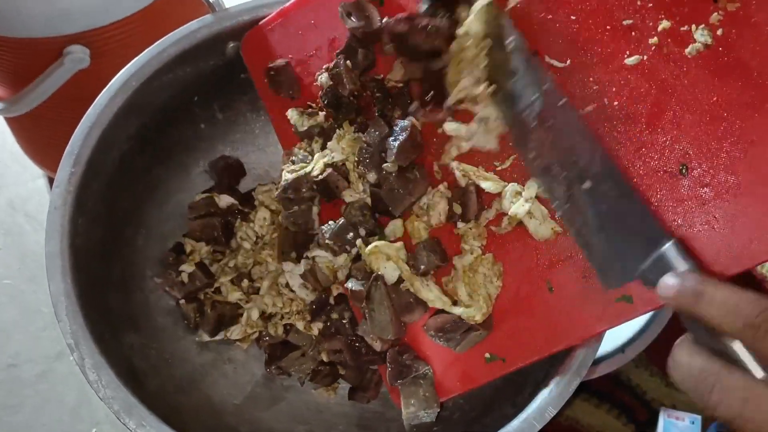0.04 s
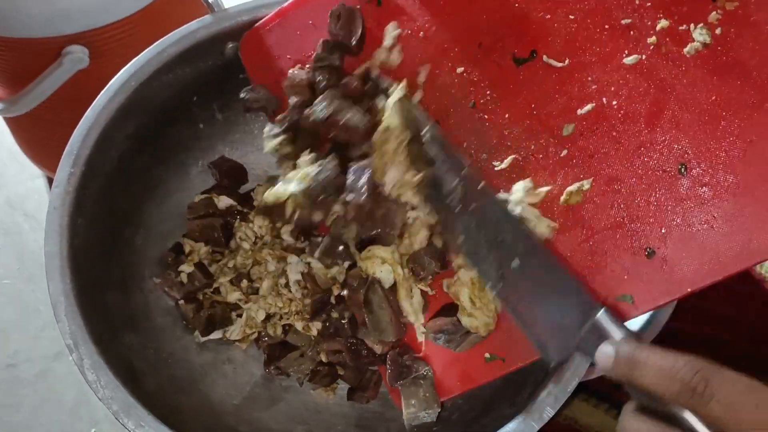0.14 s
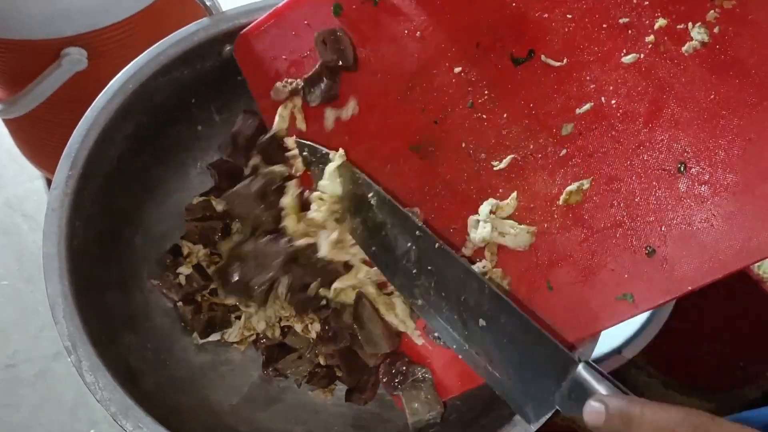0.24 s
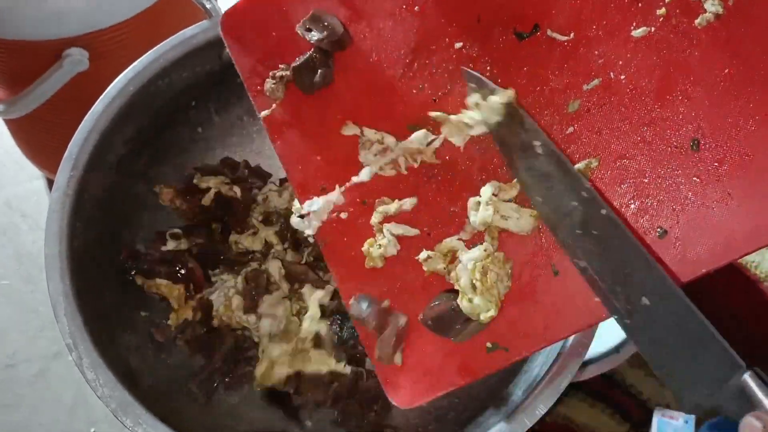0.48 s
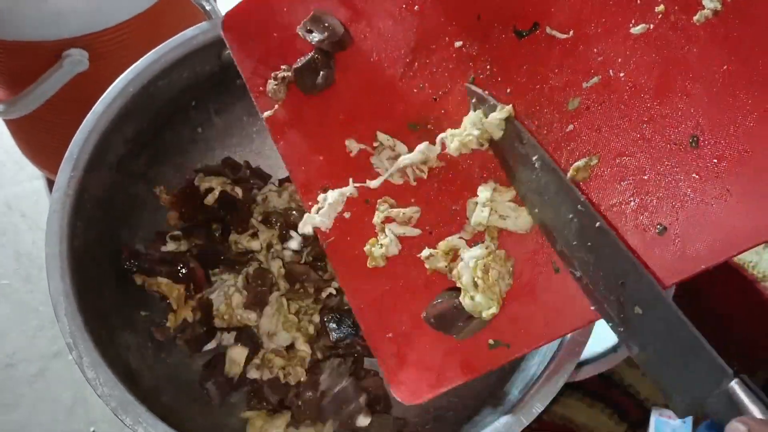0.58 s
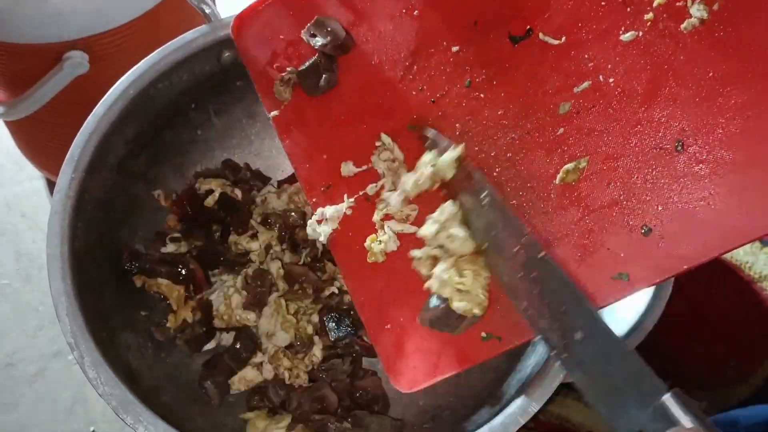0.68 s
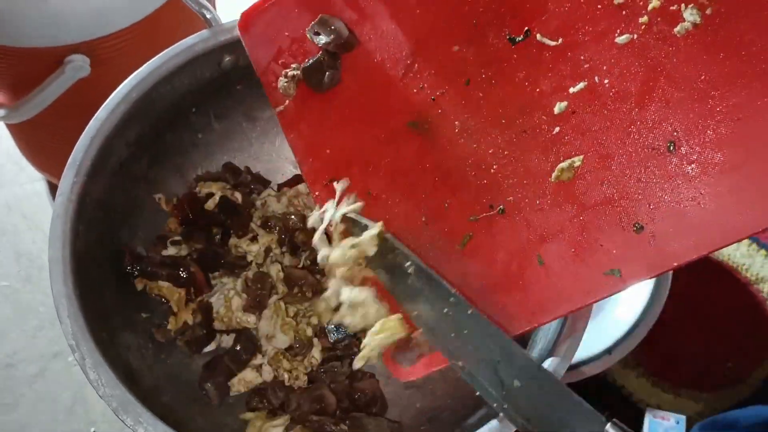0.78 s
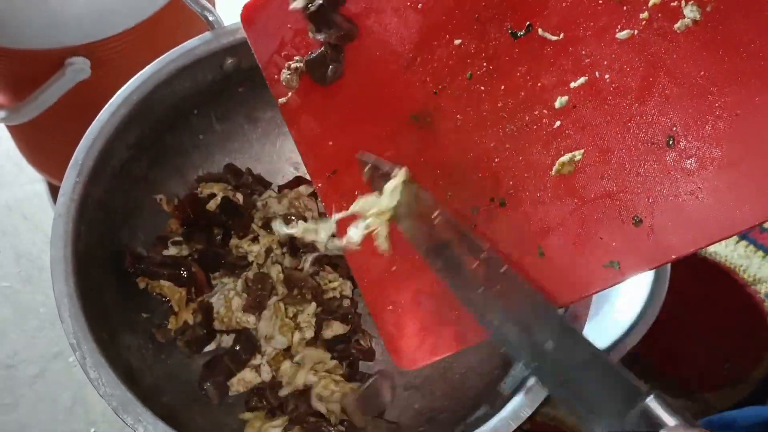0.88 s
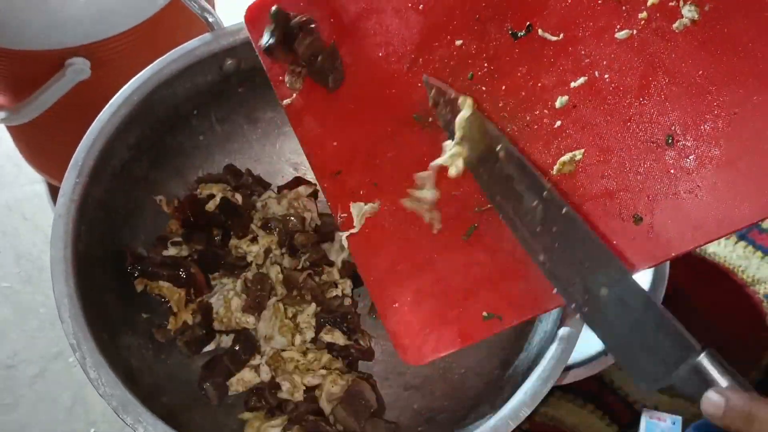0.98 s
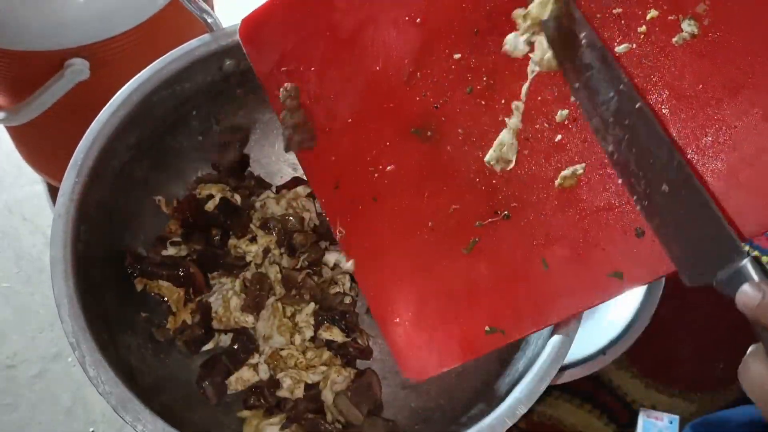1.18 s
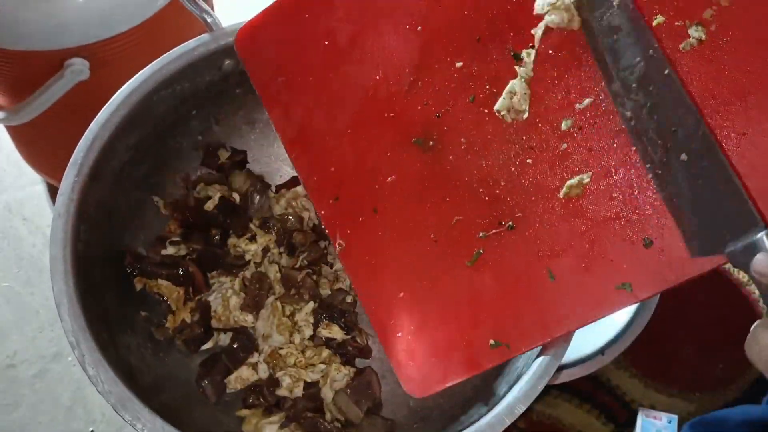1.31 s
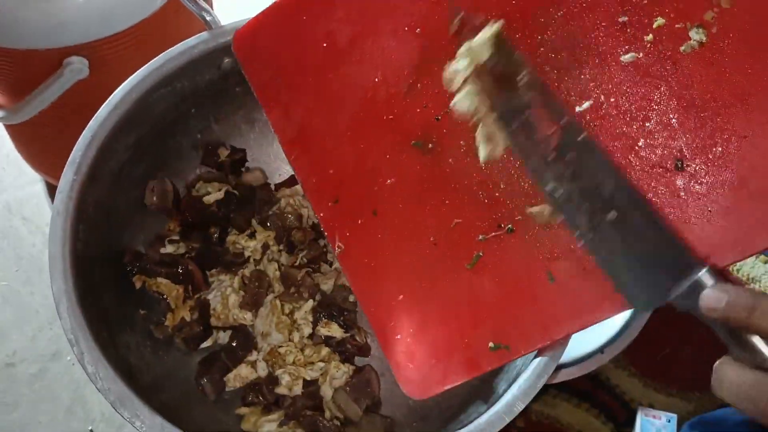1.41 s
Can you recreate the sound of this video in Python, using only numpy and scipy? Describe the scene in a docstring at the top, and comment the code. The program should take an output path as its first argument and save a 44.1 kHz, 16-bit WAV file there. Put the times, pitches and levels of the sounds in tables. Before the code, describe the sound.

A steel knife taps and scrapes a plastic board, whose edge then clangs on a metal pot

```python
"""Outdoor hiss and a low rumble, made of shaped noise, run throughout; a faint landing in a metal pot opens.
Then a steel knife taps and drags over a plastic board: noise cracks and slips, with ringing sines.
Near the middle the board's edge clangs and chatters on the pot's rim: ringing sines, noise and random bumps.
Light ticks and knocks are scattered from the taps on; later, meat drops into the pot in two soft clusters.
Nearby walls echo it all; two unlike microphone ports hear it."""
import sys
import numpy as np
from scipy import signal
from scipy.fft import rfft, irfft, next_fast_len
from scipy.io import wavfile
from scipy.ndimage import uniform_filter1d

SR = 44100
rng = np.random.default_rng(int(sys.argv[2]) if len(sys.argv) > 2 else 0)


def boost_factor(decibels):
    """Convert a level in decibels to a linear amplitude factor."""
    exponent = np.asarray(decibels, float) / 20
    return 10 ** exponent


def to_wav(sig):
    """Store sig (one row per channel, or 1-D mono) as 16-bit WAV at the path in sys.argv[1].

    Samples outside -1..1 are clipped; the rate is SR.
    """
    pcm = np.clip(np.atleast_2d(sig), -1, 1) * 32767
    pcm = np.round(pcm).astype(np.int16)
    wavfile.write(sys.argv[1], SR, pcm.T)  # frames by channels


N = 63945  # samples in the scene

# slow bending of the plastic board: f/Hz, level/dB, time to fade by 60 dB t60/s
BOARD_LOW = [(81.5, -24, 1), (125.4, -8.5, 0.52), (378, -9, 0.17), (407, -6.5, 0.1), (833, -25, 0.032)]
# high ringing of board and blade: f/Hz, level/dB, t60/s
BOARD_HIGH = [(1305, -8.5, 0.059), (1800, 3, 0.044), (1913, -3.5, 0.075), (2490, -5.5, 0.056),
              (3396, 0.5, 0.03), (3990, 0, 0.034), (6140, -11.5, 0.1)]
# ringing of the metal pot: f/Hz, level struck at the rim/dB, level struck inside/dB, t60/s
POT = [(126.1, -17, -18.5, 0.37), (276.7, -17.5, -24, 0.5), (421.4, -17, -3, 0.15), (499.2, -9, -6, 0.19),
       (593.6, 10, 0.5, 0.051), (615, 0.5, -21, 0.22), (693, -6, -22, 0.16), (832, -7, -8, 0.2),
       (1222.7, -2, -7.5, 0.15), (1765, -16, -13.5, 0.18), (2326, -10, -24, 0.2), (2575, -7.5, -33, 0.38),
       (3112, -4.5, -24, 0.057), (4280, -9.5, -41, 0.08), (4705, -21, -10.5, 0.054),
       (5560, -13, -12.5, 0.082), (6024, -8, -9, 0.044), (7920, -29, -41, 0.23)]
# the board's edge hits the rim: t/s, level/dB, contact time/s
CLANG = (.6832, -10.5, 0.0055)
# how alike a sound is at both ports: f/Hz, likeness from 0 to 1
ALIKE = [(100, 0.98), (400, 0.95), (1000, 0.59), (2000, 0.03), (5000, 0)]


def unit(x):
    """Scale to an rms (average strength) of 1."""
    return x / np.sqrt(np.mean(x ** 2) + 1e-20)


def along(points, hz):
    """Read a curve of (f/Hz, value) points, evenly in pitch."""
    f, value = np.transpose(points)
    return np.interp(np.log(hz + 1), np.log(f + 1), value)


def filtered(x, response):
    """Change each frequency's strength and timing by a complex response."""
    n = x.shape[-1]
    padded = next_fast_len(n + 8192)
    return irfft(rfft(x, padded) * response(np.fft.rfftfreq(padded, 1 / SR)), padded)[..., :n]


def half_angle(hz):
    """Half the angle that sets two ports apart: small where they are alike."""
    return np.arccos(np.clip(along(ALIKE, hz), 0, 1)) / 2


def ported(pair, gain):
    """Two unrelated signals become left and right: alike in the bass, unlike in the treble."""
    mid, side = filtered(pair, lambda hz: gain(hz) * [np.cos(half_angle(hz)), np.sin(half_angle(hz))])
    return np.array([mid + side, mid - side])


def noise(spectrum, length, centre_hz=None, octaves=1, top_loss_db=60):
    """Coloured stereo noise, rms 1 over its first 8 ms, optionally leaning to one pitch region."""
    def gain(hz):
        db = along(spectrum, hz)
        if centre_hz is not None:
            distance = np.log2((hz + 1) / centre_hz) / octaves
            most_loss = np.where(hz > centre_hz, top_loss_db, 80)
            db = db - np.minimum(6 * distance ** 2, most_loss)
        return boost_factor(db)

    burst = ported(rng.standard_normal((2, length)), gain)
    return burst / np.sqrt(np.mean(burst[:, :SR // 125] ** 2))


def ringing(modes, t, scatter_db):
    """Fading, slightly wavering sines; high ones reach the two ports at unlike phases."""
    hz, db, t60 = np.transpose(modes)[:, :, None]
    luck = rng.standard_normal((3, len(hz), 1))  # for level, starting phase and port phase
    knots = rng.standard_normal((len(hz), 40))
    wander = np.array([np.interp(t * 75, np.arange(len(k)), k) for k in knots])  # 75 knots a second
    waver = 0.84 * np.clip(hz / 600, 0, 1) * wander  # low modes are steadier
    apart = half_angle(hz) * luck[2]
    size = boost_factor(db + scatter_db * luck[0] - 60 * t / t60) * np.exp(waver / 2) / 2
    phase = 2 * np.pi * hz * t + luck[1] + waver
    return np.array([(size * np.sin(phase + side * apart)).sum(axis=0) for side in (1, -1)])


def add(track, s, sound):
    """Mix a sound in at time s, in seconds."""
    track[:, round(s * SR):][:, :sound.shape[1]] += sound


def air():
    """Outdoor hiss and rumble: noise whose loudness varies in soft patches of time and pitch."""
    # colour of the air: f/Hz, level/dB
    air_colour = [(40, -28), (72, 3), (140, -4.5), (330, -18.5), (620, -9.5), (2400, -19.5), (3650, -15),
                  (3900, -4.5), (4800, -18), (5400, -9.5), (6400, -20), (7200, -25), (11000, -35),
                  (14300, -30), (16400, -54)]
    z = signal.stft(rng.standard_normal((2, N)), nperseg=512)[2]
    patches = uniform_filter1d(rng.standard_normal(z.shape[1:]), 5, 0)  # smooth over pitch
    patches = uniform_filter1d(patches, 9, 1)  # smooth over time
    pair = signal.istft(z * boost_factor(3.9 * unit(patches)), nperseg=512)[1][:, :N]
    return boost_factor(-54) * unit(ported(pair, lambda hz: boost_factor(along(air_colour, hz))))


def yard(x):
    """Nearby walls answer with a fading noise tail, differently on each side."""
    # fading of the echo: f/Hz, t60/s
    wall_fade = [(150, 0.56), (1000, 0.39), (4000, 0.29), (12000, 0.18)]
    hz, t, z = signal.stft(rng.standard_normal((2, SR // 2)), SR, nperseg=256)
    tail = signal.istft(z * boost_factor(-60 * t / along(wall_fade, hz)[:, None]), SR, nperseg=256)[1]
    delayed = np.pad(x[:1], ((0, 0), (250, 0)))  # the left side, 250 samples late
    echo = signal.fftconvolve(delayed, tail / np.linalg.norm(tail[0]), axes=1)
    return boost_factor(-8.5) * ported(echo[:, :N], np.ones_like)


def ticks():
    """Light ticks and knocks: short noises, each around one pitch."""
    # light ticks and knocks: t/s, level/dB, f/Hz
    light_hits = [(0.267, -31.5, 1730), (0.413, -29, 590), (.4995, -24, 862), (0.8343, -30.5, 1870),
                  (0.888, -35.5, 1880), (1.0007, -32.5, 2950), (1.032, -29, 1820), (1.327, -36.5, 2810),
                  (1.33, -38, 1790)]
    out, t = np.zeros((2, N + SR)), np.arange(SR // 4) / SR
    for s, db, hz in light_hits:
        hit = noise([(3600, 2), (5500, -34)], len(t), hz, octaves=0.12, top_loss_db=17.5)
        add(out, s, boost_factor(db - 60 * t / 0.036) * (1 - np.exp(-t / 0.0018)) * hit)
    return out[:, :N]


def landings():
    """Meat lands in the pot: a soft noise thud and the pot's ring from inside."""
    # landings: t/s, ring level/dB, thud level over the ring/dB
    drops = [(.009, -40.5, 6.5), (0.9695, -18.5, 7), (.986, -28.5, 14), (1.002, -26.5, 9.5),
             (1.04, -31, 5.5), (1.2978, -25.5, 6.5), (1.312, -38, 17), (1.321, -33, 13), (1.334, -40, 11.5)]
    # colour of the soft thud: f/Hz, level/dB
    plop_colour = [(100, -23), (330, -12), (500, -1.5), (900, -7.5), (1300, -13), (2000, -21.5),
                   (3200, -28.5), (6000, -35.5), (9000, -59.5)]
    out, t = np.zeros((2, N + SR)), np.arange(SR * 2 // 5) / SR
    inside = np.delete(POT, 1, axis=1)
    loudest_db = max(drop[1] for drop in drops)
    for s, db, thud_db in drops:
        # softer landings wake the modes above 4500 Hz less
        modes = inside - np.outer(inside[:, 0] > 4500, [0, loudest_db - db, 0])
        thud = boost_factor(thud_db - 60 * t / 0.021) * noise(plop_colour, len(t))
        body = ringing(modes, t, scatter_db=3.0) + thud
        add(out, s, boost_factor(db) * body * (1 - np.exp(-(t / 0.0027) ** 2)))
    return out[:, :N]


def chatter():
    """From the clang on, the edge chatters on the rim: fading random bumps ring a damped pot."""
    bumps_per_s, bumps_t60_s = 220, 0.48
    out, t = np.zeros((2, N + SR)), np.arange(SR * 2 // 5) / SR
    bumps = (rng.random((1, len(t))) < bumps_per_s / SR) * rng.standard_normal(len(t))
    bumps = bumps * boost_factor(-60 * t / bumps_t60_s)
    held = ringing(np.delete(POT, 2, axis=1), t, scatter_db=2.5) * boost_factor(-60 * t * 27)  # extra damping

    def middle(hz):
        """Light contacts ring the middle modes, around 2400 Hz."""
        return boost_factor(-15 - 10.3 * np.log2((hz + 1) / 2400) ** 2)

    add(out, CLANG[0], filtered(signal.fftconvolve(bumps, held, axes=1)[:, :len(t)], middle))
    return out[:, :N]


def clang():
    """The board's edge hits the pot's rim: the pot rings, with a noise thud and the board's bass."""
    # colour of the hard thud: f/Hz, level/dB
    thud_colour = [(100, -30.5), (330, -20), (610, 3.5), (1000, -37), (2500, -11.5), (5000, -31.5),
                   (5900, -23.5), (7200, -35.5), (15200, -49.5), (16400, -60.5)]
    out, t = np.zeros((2, N + SR)), np.arange(SR * 2 // 5) / SR
    s, db, contact_s = CLANG
    body = ringing(np.delete(POT, 2, axis=1), t, scatter_db=1.25)
    body = body + boost_factor(5.5 - 60 * t / 0.062) * noise(thud_colour, len(t))
    body = body + boost_factor(-11.5) * ringing(BOARD_LOW, t, scatter_db=5.0)
    add(out, s, boost_factor(db) * body * (1 - np.exp(-(t / contact_s) ** 2)))
    return out[:, :N]


def drag():
    """Dense uneven slips of the blade's edge, partly ringing in the board's modes."""
    # loudness of the drag: t/s, level/dB
    stroke = [(0.2, -60), (0.278, -84), (0.4, -39.5), (0.504, -39), (0.608, -47.5), (0.68, -65)]
    # colour of the slips: f/Hz, level/dB
    grit_colour = [(120, -41), (200, 1), (387, 5), (1020, -21), (1870, 4), (4040, -22.5), (6050, -11.5),
                   (6760, -41), (16000, -43)]
    s, db = np.transpose(stroke)
    level = boost_factor(np.interp(np.arange(N) / SR, s, db, left=-120, right=-120))
    slips_per_s = 2000
    slips = (rng.random(N) < slips_per_s / SR) * boost_factor(1.1 * rng.exponential(size=N))
    slips = unit((slips + 0.24) * rng.standard_normal((2, N)))  # 0.24: a steady scrape beneath the slips
    t = np.arange(SR // 4) / SR
    board = ringing(BOARD_HIGH, t, scatter_db=0) + boost_factor(-3) * ringing(BOARD_LOW, t, scatter_db=0)
    ring = signal.fftconvolve(level * slips[:1], board / np.linalg.norm(board[0]), axes=1)[:, :N]
    scrape = level * unit(ported(slips, lambda hz: boost_factor(along(grit_colour, hz))))
    return scrape + boost_factor(-17) * ring


def taps():
    """The blade strikes the board: a sharp noise crack, the board's high ring and its bending bass."""
    # strikes: t/s, level/dB, board's bass level/dB, board's ring level/dB, crack t60/s, crack centre f/Hz
    strikes = [(0.2223, -14.5, -10, -6.5, 0.031, 3890), (0.3438, -18, -22, -44, 0.099, 5830),
               (0.374, -12, -5.5, -4, 0.054, 4120), (0.4124, -11.5, -9, -10.5, 0.02, 2820),
               (0.4796, -16, -8.5, -5.5, 0.061, 3940), (0.5007, -25.5, 1.5, -3, 0.0084, 3500),
               (0.546, -25.5, -2, 1, 0.067, 4100)]
    # colour of a crack: f/Hz, level/dB
    crack_colour = [(530, -63), (900, -23), (1570, -11), (1840, 6), (2920, -0.5), (4000, -3.5),
                    (5690, -4.5), (7520, -12.5), (15400, -32), (16400, -66)]
    out, t = np.zeros((2, N + SR)), np.arange(SR // 4) / SR
    onset = 1 - np.exp(-(t / 0.0004) ** 2)
    snap = 1 + boost_factor(-60 * t / 0.0013)  # the very start is stronger
    for s, db, bass_db, ring_db, crack_s, hz in strikes:
        crack = 0.46 * noise(crack_colour, len(t), hz, octaves=0.61, top_loss_db=7)
        crack = crack * boost_factor(-60 * t / crack_s) * snap * onset
        ring = boost_factor(ring_db) * ringing(BOARD_HIGH, t, scatter_db=2.0) * (1 - np.exp(-t / 0.0004))
        bass = boost_factor(bass_db) * ringing(BOARD_LOW, t, scatter_db=4.5) * (1 - np.exp(-t / 0.001))
        add(out, s, boost_factor(db) * (crack + ring + bass))
    return out[:, :N]


def scene():
    """Knife, board and pot, with their echo, in the yard's air."""
    near = ticks() + landings() + chatter() + clang() + drag() + taps()
    return near + yard(near) + air()


def roll_off(x):
    """The treble ends steeply here."""
    return signal.sosfilt(signal.butter(12, 16500, fs=SR, output="sos"), x)


def record(dry):
    """Each port has its own colour, the left hears first, deep bass is cut and peaks round off."""
    # left port over right port: f/Hz, level/dB
    port_colour = [(400, -0.5), (1700, -3.5), (3100, -7.5), (4500, -13), (5900, -17), (6550, -15.5),
                   (7250, 8), (8300, 7), (10500, -1), (12500, 5.5), (15500, -18)]
    left_lead_s, low_cut_hz = 0.0001, 61
    sides = np.array([[1], [-1]])

    def ports(hz):
        colour = boost_factor(sides * along(port_colour, hz) / 2)
        lead = np.exp(1j * np.pi * sides * hz * left_lead_s)
        return colour * lead / np.sqrt(1 + (low_cut_hz / (hz + 1)) ** 8)

    mix = 0.92 * np.tanh(filtered(dry, ports) / 0.87)
    return roll_off(mix)


dry = scene()
out = record(dry)
to_wav(out)
```